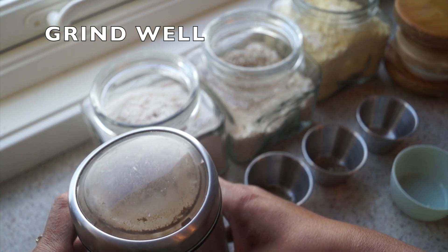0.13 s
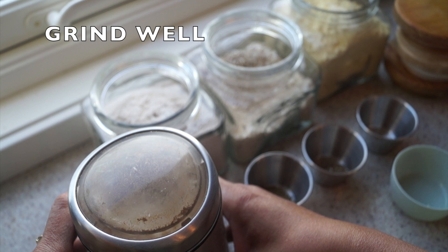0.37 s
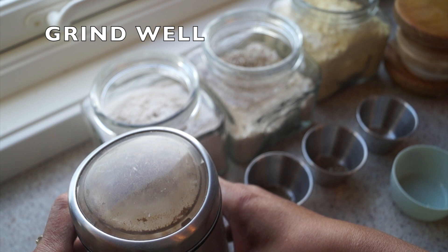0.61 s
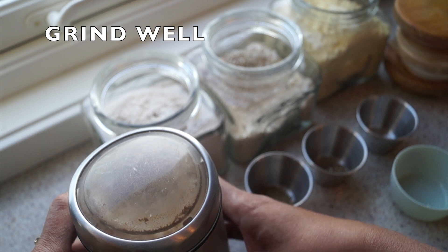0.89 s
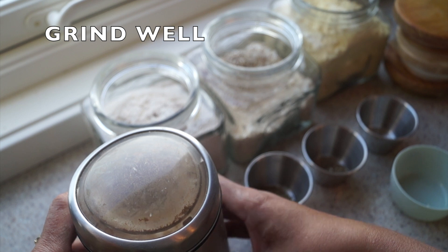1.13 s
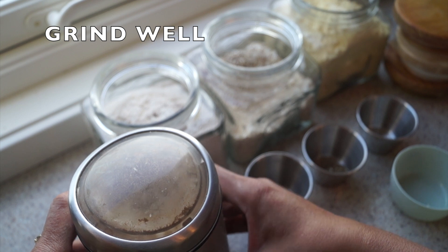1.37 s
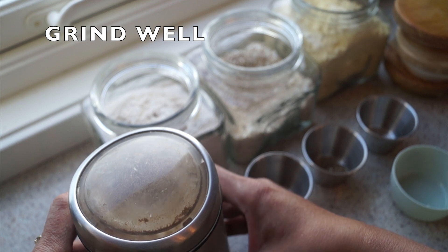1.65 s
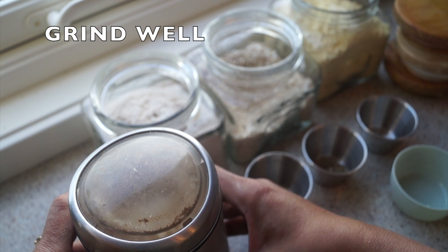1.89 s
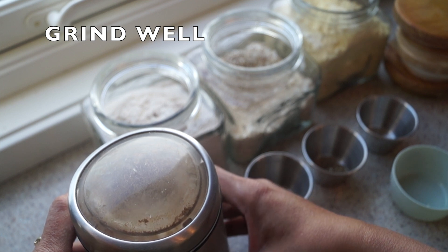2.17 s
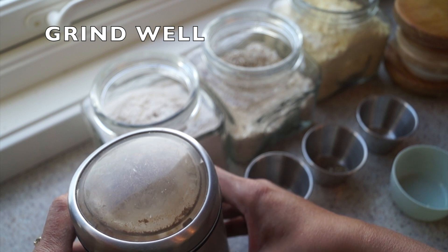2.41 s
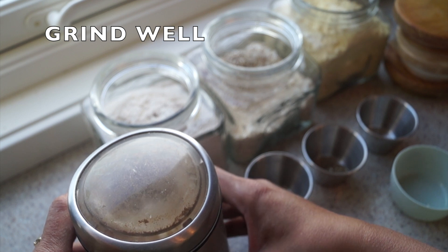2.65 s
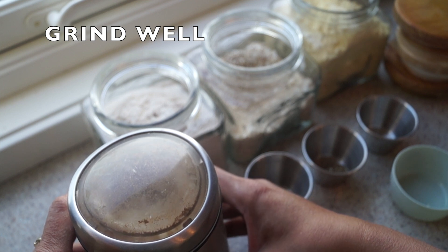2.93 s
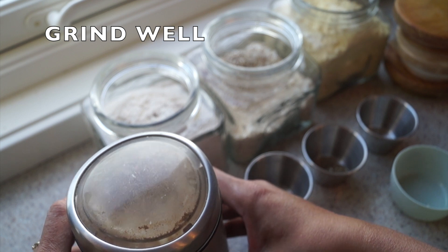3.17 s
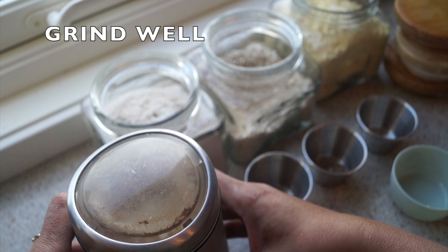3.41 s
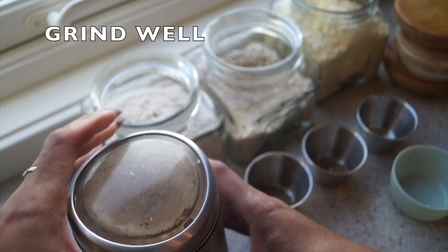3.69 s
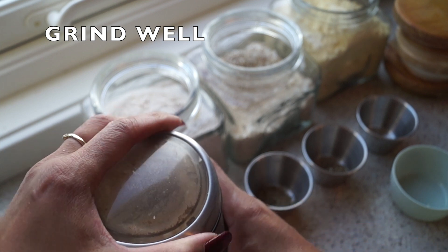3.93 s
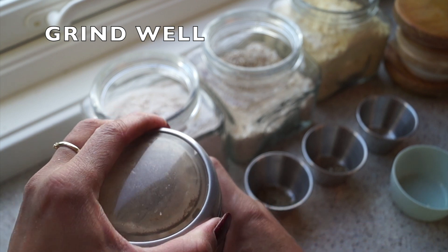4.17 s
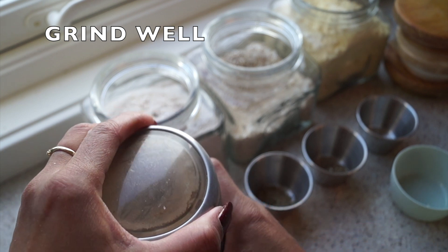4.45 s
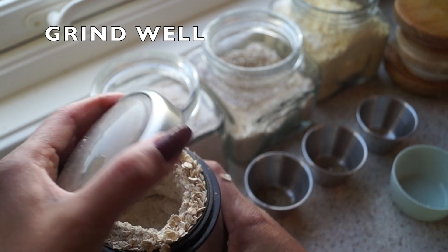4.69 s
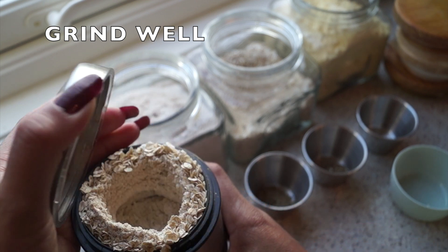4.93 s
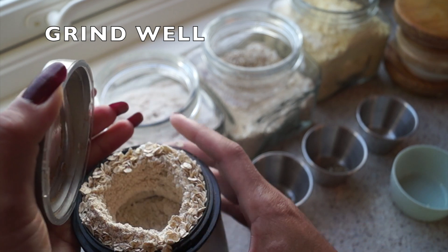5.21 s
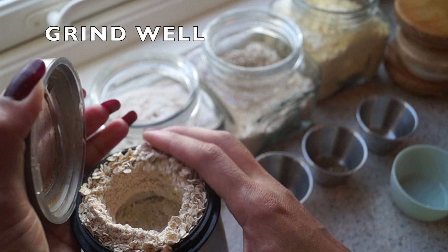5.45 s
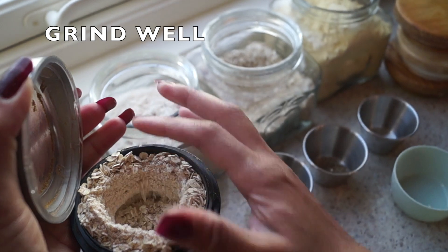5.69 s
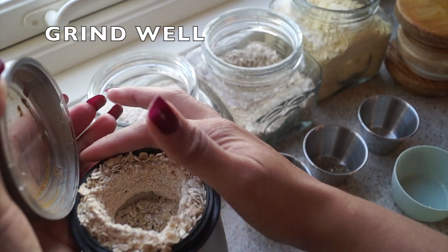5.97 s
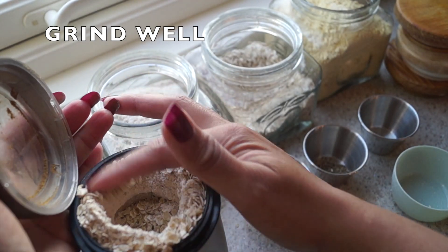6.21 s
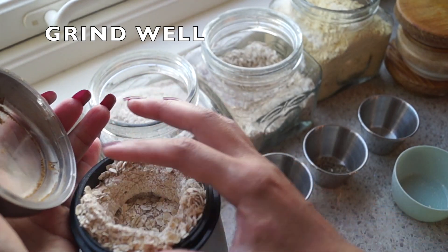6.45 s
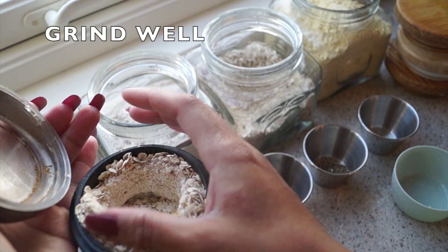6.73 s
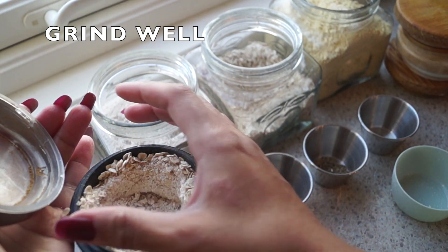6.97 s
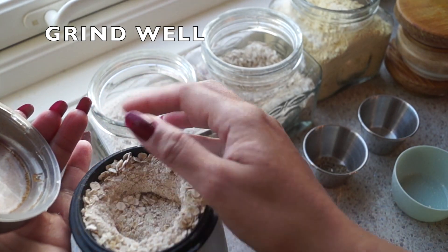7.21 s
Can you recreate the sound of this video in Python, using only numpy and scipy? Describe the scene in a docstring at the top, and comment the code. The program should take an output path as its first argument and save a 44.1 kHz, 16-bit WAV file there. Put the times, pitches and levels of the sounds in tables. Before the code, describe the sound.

High-pitched blade grinder buzzes in two runs with falling spin-downs, followed by quiet lid clicks, finger scrapes and dull knocks in a kitchen.

```python
"""A small blade grinder whines at full speed on a kitchen counter, coasts down, runs again and coasts down.
Its mains motor is a stack of shaft orders with torque sidebands over noise of meal in the steel cup and air.
Then hands lift the lid, rub it, stir the meal and knock cup and counter: shaped noise strokes, struck modes
and noise ticks with a short room tail. A close stereo microphone adds faint hiss."""
import sys
import numpy as np
from scipy import signal
from scipy.fft import rfft, irfft, next_fast_len
from scipy.io import wavfile
from scipy.ndimage import uniform_filter1d, map_coordinates

SR = 44100
rng = np.random.default_rng(int(sys.argv[2]) if len(sys.argv) > 2 else 0)


def elevation(decibels):
    """Turn decibel levels (scalar or array-like) into linear amplitude ratios."""
    levels = np.asarray(decibels, float)
    return 10 ** (levels / 20)


def store_pcm(level_fs):
    """Save levels as 16-bit WAV."""
    pcm = np.round(np.clip(level_fs, -1, 1) * 32767).astype(np.int16)
    wavfile.write(sys.argv[1], SR, np.atleast_2d(pcm).T)


N = 324135
T = np.arange(N) / SR


def unit(x):
    """Scale to rms 1."""
    return x / np.sqrt(np.mean(x ** 2) + 1e-20)


def along(points, hz):
    """Interpolate (Hz, value) points on a log axis."""
    f, v = np.transpose(points)
    return np.interp(np.log(hz + 1), np.log(f + 1), v)


def curves(rows):
    """One value per sample from (s, value) rows joined by straight lines."""
    return np.interp(T, *np.transpose(rows))


def wobble(rate_hz):
    """Smooth random curve through rate_hz knots a second, at most 50."""
    coarse_s = T[::64]
    knots = rng.standard_normal(int(N / SR * 60))
    return np.interp(T, coarse_s, map_coordinates(knots, [coarse_s * min(rate_hz, 50)]))


def filtered(x, response):
    """x through a response given as a function of Hz."""
    m = next_fast_len(N + 8192)
    return irfft(rfft(x, m) * response(np.fft.rfftfreq(m, 1 / SR)), m)[..., :N]


def bumps(modes, hz):
    """Sum of resonance peaks from (centre Hz, width Hz, height dB) modes."""
    return sum(elevation(db) / (1 + ((hz - c) / (w / 2)) ** 2) ** 0.76 for c, w, db in modes)


def shape(spectrum):
    """Gain over frequency from (Hz, dB) points."""
    return lambda hz: elevation(along(spectrum, hz))


def rush(colour, alike, patchy_db):
    """Stereo noise of mid rms 1, patchy in time and frequency, with a set left-right correlation."""
    z = signal.stft(rng.standard_normal((2, N)), nperseg=512)[2]
    field = uniform_filter1d(rng.standard_normal(z.shape[1:]), size=5, axis=0)
    field = uniform_filter1d(field, size=10, axis=1)
    pair = signal.istft(z * elevation(patchy_db * unit(field)), nperseg=512)[1][:, :N]
    turn = lambda hz: np.arccos(np.clip(along(alike, hz), -1, 1)) / 2
    mid, side = filtered(pair, lambda hz: colour(hz) * [np.cos(turn(hz)), np.sin(turn(hz))])
    return np.array([mid + side, mid - side]) / np.std(mid)


def tone(phase, lag_rad, waver_db):
    """Stereo sine near rms 1; level wavers in common, phase wavers differently at each ear."""
    common = phase + 0.21 * waver_db * wobble(14)
    ears = [common + side * lag_rad / 2 + .13 * waver_db * wobble(8.014) for side in (1, -1)]
    level = elevation(waver_db * (.8 * wobble(22) + .7 * wobble(5)))
    return np.sqrt(2) * level * np.sin(ears)


def strokes(rows, rise_s):
    """Low and high gain of strokes that gain 20 dB per rise_s to a peak, may hold it, and fade."""
    s, low_db, high_db, fade_s, *hold_s = np.transpose(rows)[..., None]
    fading = np.clip(T - s - sum(hold_s), 0, None) / fade_s
    slope_db = -20 * np.where(T < s, (s - T) / rise_s, fading)
    return [np.sqrt(np.sum(elevation(db + slope_db) ** 2, axis=0)) for db in (low_db, high_db)]


# Closed switch. Each row: on in s, off in s, hum level in dB at first, hum level in dB at the end.
SWITCH_CLOSED = [(-1, .817, -54, -52), (1.346, 3.494, -52, -57)]
# Full speed under the changing load. Each row: time in s, shaft speed in Hz.
LOADED_SPEED = [(0, 308), (.21, 309.5), (.27, 304.5), (.49, 310.5), (.57, 308.5), (.65, 311.5), (1.8, 308),
                (1.93, 304.5), (2, 306.5), (2.05, 303.5), (2.2, 301.5), (2.31, 307.5), (2.43, 304.8),
                (2.51, 308.5), (2.7, 304.5), (2.89, 312.5), (3, 309), (3.08, 311.8), (3.17, 309),
                (3.24, 310), (3.37, 307.8), (3.49, 312)]


def switch():
    """Shaft speed, power gate, hum and settling gains: exponential spin-up, coasting braked by drag and friction."""
    spin_up_s, coast_s = .074, .6  # time constants
    friction_hz = 300  # dry friction, as the speed at which drag equals it
    hum_fade_s, settle_s = .1, .9  # time to lose 20 dB
    settle_db = -55
    hz, on, hum, settle, full_hz = 0, 0, 0, 0, curves(LOADED_SPEED)
    for on_s, off_s, first_db, last_db in SWITCH_CLOSED:
        since_s, after_s = np.clip(T - on_s, 0, None), np.clip(T - off_s, 0, None)
        coast_hz = (full_hz + friction_hz) * np.exp(-after_s / coast_s) - friction_hz
        hz = hz + (1 - np.exp(-since_s / spin_up_s)) * np.clip(coast_hz, 0, None)
        on = on + (T >= on_s) * (T < off_s)
        hum_db = np.interp(T, [on_s, off_s], [first_db, last_db]) - 20 * after_s / hum_fade_s
        hum = hum + (T >= on_s) * elevation(hum_db)
        settle = settle + (T >= off_s) * elevation(settle_db - 20 * after_s / settle_s)
    return hz, uniform_filter1d(on * 1., size=600), hum, settle


# Tones at full speed; orders 1 and 2 take their own level from FIRST_ORDER and SECOND_ORDER.
# Each row: shaft order, lower sideband in dB, order in dB, upper sideband in dB.
SHAFT_ORDERS = [(1, -66, -36, -66), (1.5, -70, -50, -70), (2, -45, -32, -39), (3, -49, -39.5, -49),
                (4, -56, -42, -49), (5, -49, -41, -39.5), (6, -43, -41, -37.5), (7, -39, -35, -54),
                (8, -56, -36.5, -53), (9, -43, -38, -43), (10, -34.5, -33.5, -38), (11, -54, -40.5, -46),
                (12, -51, -46, -49), (13, -46, -47, -58), (14, -58, -45, -50), (15, -52, -48, -50),
                (17, -58, -48, -48)]
# First order. Each row: shaft speed in Hz, level in dB.
FIRST_ORDER = [(40, -82), (90, -74), (122, -49), (160, -56), (200, -48), (232, -40), (310, -36)]
# Second order at full speed. Each row: time in s, level in dB.
SECOND_ORDER = [(0, -38.5), (.476, -23), (.602, -33.5), (.746, -28), (.86, -37), (1.5, -40.5),
                (2.02, -24.5), (2.07, -38.5), (2.19, -43), (2.32, -29.5), (2.45, -38), (2.6, -23),
                (2.78, -40), (3.4, -28.5), (3.52, -33)]
# Housing rings swept by coasting blade orders. Each row: centre in Hz, width in Hz, height in dB.
HOUSING_RINGS = [(150, 53.4, -41), (350, 41.9, -43), (750, 84, -32.5), (1250, 120, -34.5)]
# Housing ring under the commutator whine (tenth order and sidebands). Each row: frequency in Hz, gain in dB.
WHINE_RING = [(2450, -18), (2770, 10), (2880, -4), (2950, -1), (3005, 6), (3100, -4), (3250, -16)]


def whine(hz, speed, on, hum, first_db, second_db, shaft, torque, torque_hz):
    """Shaft orders, split into sidebands by torque pulses at twice the mains frequency, plus mains hum."""
    own_level = {1: elevation(first_db), 2: on * speed ** 4 * elevation(second_db)}
    out = 0
    for k, low_db, db, high_db in SHAFT_ORDERS:
        level = own_level[k] if k in own_level else elevation(db) * speed ** 5
        if k == 10:
            level = on * elevation(db + along(WHINE_RING, k * hz))
            low_db = low_db + along(WHINE_RING, abs(k * hz - torque_hz))
            high_db = high_db + along(WHINE_RING, k * hz + torque_hz)
        if k in (2, 4, 6):
            ringing = (1 - speed ** 3) * np.clip(5 * speed - .1 * k - .9, 0, 1)
            level = level + ringing * bumps(HOUSING_RINGS, k * hz)
        out = out + level * tone(k * shaft, -.49, 1.2 if k < 3 else 2.8)
        lower = elevation(low_db) * tone(k * shaft - torque, -.4, 2.8)
        upper = elevation(high_db) * tone(k * shaft + torque, -.4, 2.8)
        out = out + on * speed ** 2.77 * (lower + upper)
    ear_db = np.array([[2.2], [-2.2]])
    return out + hum * elevation(ear_db) * tone(torque, .98, 2.2)


# Meal swept round the cup at full speed. Each row: frequency in Hz, relative density in dB per Hz.
MEAL_FAST = [(70, -52.5), (130, -28), (280, -24.5), (395, -24), (480, -7.5), (600, -3.5), (665, -9),
             (740, -10), (1400, -11), (1900, -4), (2350, -6), (2900, 0), (3250, -8.5), (5000, -15),
             (6500, -30)]
# Meal at low speed. Each row: frequency in Hz, relative density in dB per Hz.
MEAL_SLOW = [(70, -54), (130, -23.5), (300, -11.5), (355, -2.5), (400, -51), (470, -9.5), (745, 2),
             (1150, -12), (1750, -6), (2800, -14), (4300, -12.5), (6500, -50)]
# Fan and brush hiss. Each row: frequency in Hz, relative density in dB per Hz.
AIR_HISS = [(2060, -29.5), (3500, -7.5), (3890, 4), (4120, -4.5), (4470, -3), (4970, -4.5), (5400, 0),
            (5950, -4), (7750, -13.5), (9040, -5), (11000, -13.5), (14300, -51), (22000, -120)]
# Cup rings. Each row: centre in Hz, width in Hz, height in dB over the noise colour.
CUP_RINGS = [(1710, 72, 0), (1940, 20, 10), (2760, 27, -14), (3390, 32, 6), (4200, 32, -18.5),
             (4380, 40, 5), (5640, 40, -6), (7060, 26, 2.5), (8380, 75, 2), (8830, 60, 6.5),
             (10530, 110, 1.5)]
# Stereo image of the noise. Each row: frequency in Hz, left-right correlation.
NOISE_ALIKE = [(60, 0.54), (170, 0.92), (490, 0.42), (1420, 0.52), (4080, 0.6), (11700, 0.13)]
# Noise against speed, before trims. Each row: shaft speed in Hz, meal rush in dB, air hiss in dB.
NOISE_BY_SPEED = [(0, -75, -75), (20, -64, -66), (60, -52, -58), (110, -38.5, -51), (180, -30.5, -36),
                  (280, -30, -29), (310, -29.8, -28.8)]


def meal_and_air(steady_hz, speed, on, second_db, shaft, torque):
    """Noise of meal and air coloured by cup rings, beating with blade passes and mains; also the settling noise."""
    start_db, start_hiss_db = 2, 5  # extra rush and brush hiss while the motor pulls up to speed
    meal_follows = .2  # dB of rush per dB of second order
    fast = speed ** 3
    points_hz, meal_points_db, air_points_db = np.transpose(NOISE_BY_SPEED)
    meal_db = along(np.column_stack([points_hz, meal_points_db]), steady_hz)
    air_db = along(np.column_stack([points_hz, air_points_db]), steady_hz)
    meal_db = meal_db + start_db * on * (1 - fast) + meal_follows * fast * (second_db - second_db.mean())
    air_db = air_db + start_hiss_db * on * (1 - fast)
    in_cup = lambda spectrum: lambda f: shape(spectrum)(f) * (1 + bumps(CUP_RINGS, f))
    slow_meal = rush(shape(MEAL_SLOW), NOISE_ALIKE, patchy_db=1)
    fast_meal = rush(in_cup(MEAL_FAST), NOISE_ALIKE, patchy_db=-.5)
    meal = np.sqrt(fast) * fast_meal + np.sqrt(1 - fast) * slow_meal
    air = rush(in_cup(AIR_HISS), NOISE_ALIKE, patchy_db=1)
    # each blade pass throws the meal, and the mains shakes it
    beat_db = 1.63 * (1 - fast) * np.sin(2 * shaft) + .58 * on * np.sin(torque) + wobble(25.14)
    ear_db = np.array([[.2], [-1.2]])
    running = elevation(beat_db) * (elevation(meal_db + 2.2) * meal + elevation(air_db + ear_db) * air)
    return running, slow_meal + .6 * air


def motor():
    """Whine and noise share one shaft; meal trickles down after the switch opens."""
    torque_hz = 100  # twice the mains frequency
    steady_hz, on, hum, settle = switch()
    first_db, second_db = along(FIRST_ORDER, steady_hz), curves(SECOND_ORDER)
    hz = steady_hz * (1 + .001 * wobble(15))  # the load of meal tugs at the speed
    speed = np.clip(hz / np.max(hz), 0, 1)
    shaft, torque = 2 * np.pi * np.cumsum(hz) / SR, 2 * np.pi * torque_hz * T
    tones = whine(hz, speed, on, hum, first_db, second_db, shaft, torque, torque_hz)
    noise, trickle = meal_and_air(steady_hz, speed, on, second_db, shaft, torque)
    return settle * trickle + (hz > 0) * (tones + noise)


# Floor colour. Each row: frequency in Hz, relative density in dB per Hz.
FLOOR_COLOUR = [(15, -36.5), (25, -16), (303, -7.5), (1260, -12), (1550, -14.5), (1670, -15), (8310, -26),
                (11000, -29.5), (14300, -51), (22000, -120)]
# Floor stereo image. Each row: frequency in Hz, left-right correlation.
FLOOR_IMAGE = [(60, 0.87), (170, 0.54), (490, -0.65), (1420, -0.72), (4080, -0.4), (11700, 0.4)]


def microphone_floor():
    """Steady coloured noise of the room and microphone."""
    return elevation(-59.5) * rush(shape(FLOOR_COLOUR), FLOOR_IMAGE, patchy_db=.4)


# Ticks of switch, lid and nails. Each row: start in s, peak in dB, centre in Hz, t60 in s.
SHARP_TICKS = [(1.3364, -40, 1200, 0.022), (1.3545, -26, 2300, 0.021), (1.355, -33, 8000, .012),
               (4.153, -40, 1980, 0.015), (4.18, -29, 1650, 0.028), (4.3076, -38, 2250, 0.022),
               (4.3501, -24, 2930, 0.03), (4.579, -41, 9000, 0.019), (4.9553, -48, 5950, 0.026),
               (5.6233, -34, 3210, 0.05), (5.6308, -30, 2110, 0.023), (5.9933, -47, 2650, 0.027),
               (6.0312, -29, 1250, 0.019), (7.149, -51, 1630, 0.022)]


def ticks():
    """Short cracks of decaying noise, coloured round their centre, with a thin bright edge."""
    out, t = np.zeros(N + SR), T[:4096]
    f = np.fft.rfftfreq(len(t), 1 / SR)
    for s, db, hz, t60_s in SHARP_TICKS:
        resonance = 1j * f * hz / (hz * hz - f * f + .75j * f * hz)
        colour = resonance ** 2 + .13 * (f > 900)
        burst = elevation(-60 * t / t60_s) * rng.standard_normal(len(t))
        crack = irfft(rfft(burst) * colour)
        out[round(s * SR):][:len(t)] += elevation(db) * crack / np.max(abs(crack))
    return out[:N]


# Room decay. Each row: frequency in Hz, t60 in s.
ROOM_DECAY = [(200, 0.25), (1000, 0.34), (4000, 0.39), (10000, 0.14)]


def kitchen(x):
    """Each frequency of the room's answer dies at its own speed; a new noise tail for each stretch."""
    out, step, delay = np.zeros((2, N + SR)), SR // 4, 200  # samples
    for a in range(0, N, step):
        hz, t, z = signal.stft(rng.standard_normal((2, SR // 2)), SR, nperseg=256)
        decay = elevation(-60 * t / along(ROOM_DECAY, hz)[:, None])
        tail = signal.istft(z * decay, SR, nperseg=256)[1]
        wet = signal.fftconvolve(x[None, a:a + step], tail / np.linalg.norm(tail[0]), axes=1)
        out[:, a + delay:a + delay + wet.shape[1]] += wet
    return out[:, :N]


# Skin on lid and meal. Each row: peak time in s, low level in dB, high level in dB, time to fade 20 dB in s.
BRUSH_STROKES = [(4.05, -64, -68, .5), (4.19, -43, -46, .09), (4.26, -56, -66, .3), (4.36, -50.5, -70, .3),
                 (4.45, -53, -75, .2), (4.515, -52, -70, .06), (4.58, -58, -58, .08),
                 (4.635, -53, -70, .08), (4.7, -66, -63, .25), (4.96, -62, -64, .15), (5.12, -61, -68, .2),
                 (6.82, -70, -70, .1), (7.16, -54.5, -64.5, .07)]
# Low part of the rustle. Each row: frequency in Hz, relative density in dB per Hz.
SKIN_DULL = [(180, -2), (350, -4.5), (1500, -2), (3500, -14.5)]
# High part of the rustle. Each row: frequency in Hz, relative density in dB per Hz.
SKIN_BRIGHT = [(1500, -32), (2500, -1.5), (4600, 1.5), (11000, -12)]
# Stereo image of the hands. Each row: frequency in Hz, left-right correlation.
HANDS_ALIKE = [(300, 0.37), (3000, 0.81), (11000, 0.23)]


def brushing():
    """Skin brushes lid and meal: two bands of patchy noise that swell and fade."""
    low, high = strokes(BRUSH_STROKES, rise_s=.04)
    dull = low * rush(shape(SKIN_DULL), HANDS_ALIKE, patchy_db=3)
    bright = high * rush(shape(SKIN_BRIGHT), HANDS_ALIKE, patchy_db=3)
    return dull + bright


# Dull knocks. Each row: start in s, peak in dB, lowest Hz excited, highest Hz excited, ring time factor.
DULL_KNOCKS = [(4.428, -33, 493, 1300, 0.23), (4.668, -21.5, 450, 1700, 0.22), (5.131, -37, 110, 800, 0.65),
               (5.184, -41, 110, 300, 0.35), (5.572, -51, 110, 247, 0.87), (6.027, -21, 85, 820, 0.3),
               (6.033, -11.5, 170, 1800, 0.58), (6.057, -25, 505, 1010, 0.69),
               (6.288, -20, 150, 1200, 0.64)]
# Cup and counter modes. Each row: frequency in Hz, mean level in dB, t60 in s at ring time factor 1.
COUNTER_MODES = [(95, -8, .15), (140.6, -8, 0.22), (200, -3, 0.16), (259, 2, 0.11), (330.6, -8.5, 0.27),
                 (477, -10.5, 0.14), (614, -11.5, 0.2), (702, -9, 0.22), (795, -5.5, 0.26),
                 (890, -14, 0.04), (1059, -4, 0.12), (1250, 2.5, 0.061), (1550, -8, 0.15), (2250, -21, .07)]


def knocks():
    """A gritty contact, band-limited, rings close pairs of modes at new strengths each time."""
    out, t = np.zeros(N + SR), T[:SR // 2]
    for s, db, low_hz, high_hz, free in DULL_KNOCKS:
        ring = 0
        for hz, level_db, t60_s in COUNTER_MODES:
            decay = elevation(level_db + rng.normal(0, 2.5) - 60 * t / (t60_s * free))
            twin_hz = hz * (1 + rng.normal(0, .04))
            twin = np.cos(2 * np.pi * twin_hz * t + rng.uniform(0, 6))
            ring = ring + decay * (np.cos(2 * np.pi * hz * t) + .8 * twin)
        grit = 5 * elevation(-60 * t / (.15 * free)) * rng.standard_normal(len(t))
        band = signal.butter(3, [low_hz, high_hz], "band", fs=SR, output="sos")
        blow = signal.sosfilt(band, ring + grit)
        out[round(s * SR):][:len(t)] += elevation(db) * blow / np.max(abs(blow))
    return out[:N]


# Finger slips on the cup rim.
# Each row: peak time in s, low level in dB, high level in dB, time to fade 20 dB in s, hold before it in s.
RIM_SLIPS = [(5.625, -48, -48, .22, 0), (5.748, -48.5, -46, .03, .065)]
# Low rim rings. Each row: centre in Hz, width in Hz, height in dB, before the power of 0.85 in rubbing().
RIM_LOW_RINGS = [(690, 130, 5), (1250, 140, -11), (1440, 130, -3), (2140, 200, -5)]
# High rim rings. Each row: centre in Hz, width in Hz, height in dB, before the same power.
RIM_HIGH_RINGS = [(3370, 240, 7), (4080, 400, -8), (5000, 370, -29), (6270, 320, -21)]


def rubbing():
    """Skin sticks and slips on the rim: noise through rim rings under a fast random gain."""
    low, high = strokes(RIM_SLIPS, rise_s=.006)
    stick_slip = elevation(3 * wobble(48))
    through = lambda rings: rush(lambda f: bumps(rings, f) ** 0.85, HANDS_ALIKE, patchy_db=-1)
    return stick_slip * (low * through(RIM_LOW_RINGS) + high * through(RIM_HIGH_RINGS))


def scene():
    """Grinder, hands and knocks over the room and microphone floor."""
    cracks, thuds = ticks(), knocks()
    room = kitchen(elevation(-5) * (thuds + cracks))
    hands = brushing() + rubbing()
    return motor() + microphone_floor() + cracks + room + hands + thuds


def low_pass(x):
    """Removes everything above the highest recorded frequency."""
    return signal.sosfilt(signal.butter(12, 12320, fs=SR, output="sos"), x)


def record(dry):
    """The microphone rolls off the deep bass and cuts the top."""
    bass_hz, top_hz = 28, 11150
    heard = filtered(dry, lambda hz: (hz < top_hz) * (1j * hz / (1j * hz + bass_hz)) ** 2)
    return low_pass(heard)


dry = scene()
out = record(dry)
store_pcm(out)
```